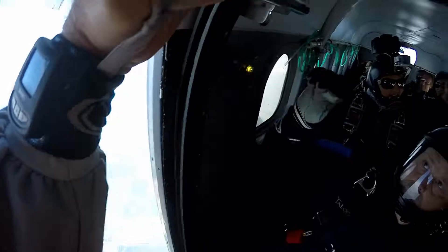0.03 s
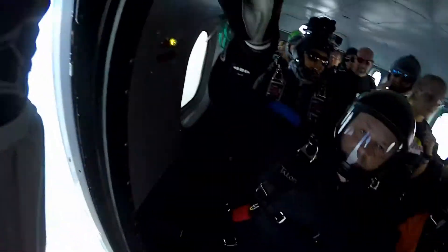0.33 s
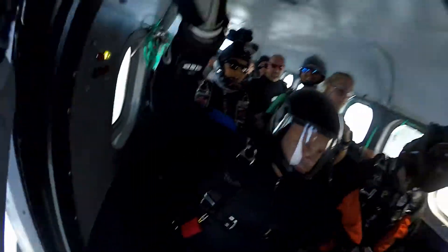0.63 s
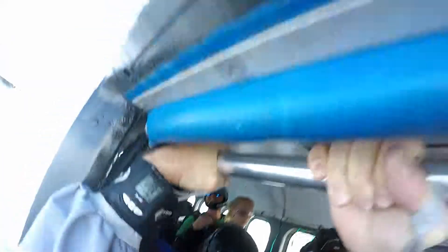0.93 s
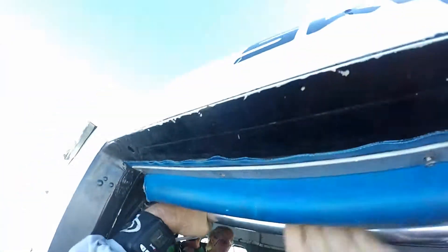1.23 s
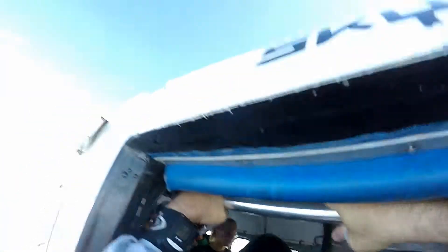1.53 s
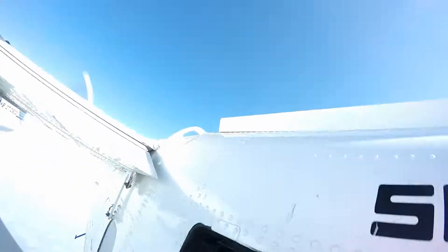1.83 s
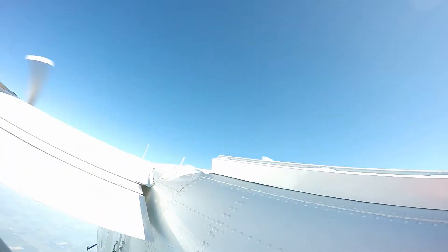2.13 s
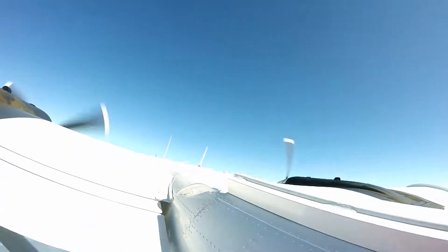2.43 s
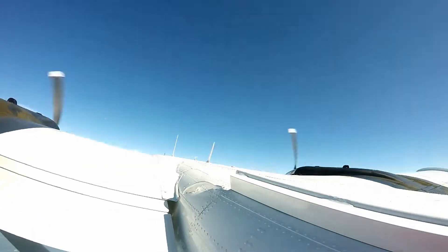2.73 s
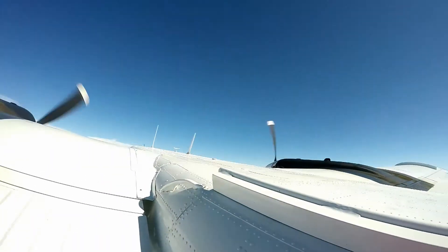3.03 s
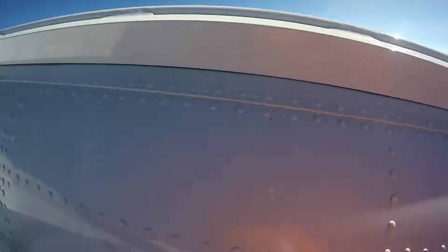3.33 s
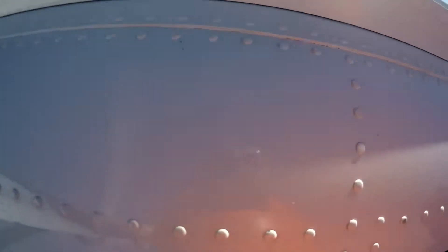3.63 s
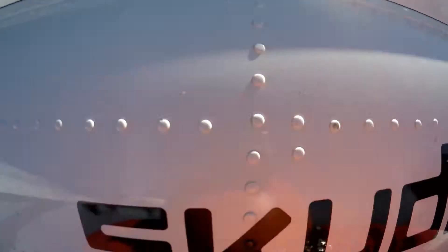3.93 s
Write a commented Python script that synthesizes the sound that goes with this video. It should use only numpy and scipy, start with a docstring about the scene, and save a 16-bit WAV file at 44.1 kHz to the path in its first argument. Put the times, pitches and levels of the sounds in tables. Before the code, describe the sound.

Loud wind rushes over a camera case outside a flying propeller plane. In the first 0.4 seconds a sleeve scrapes the case, with two hard knocks among lighter snags. A quiet moment follows: muffled engines, a faint draught and a thin turbine whine. At about 1 second the engines swell and the slipstream hits, with deep rumble, rapid buffeting and harsh hiss continuing until the end at 4 seconds.

```python
"""At the door of a propeller aircraft in flight, a small camera in a plastic housing is carried outside.
A sleeve rubs over the housing and it takes two hard knocks among lighter snags. The cabin is briefly
quiet: muffled engines, a draught, a thin turbine whine. From one second on the slipstream hits: large
eddies rumble, small ones buffet the case in bursts, and a harsh rush rings in the housing."""
import sys
import numpy as np
from scipy import signal
from scipy.fft import rfft, irfft
from scipy.io import wavfile
from scipy.ndimage import uniform_filter1d

SR = 44100
rng = np.random.default_rng(int(sys.argv[2]) if len(sys.argv) > 2 else 0)


def wrap_up_sound(samples):
    """Save the sound to the file named by the first command line argument, as 16-bit audio."""
    columns = np.atleast_2d(samples).T
    # keep every value between -1 and 1, then stretch to whole-number steps
    tamed = np.clip(columns, -1, 1)
    steps = np.round(tamed * 32767).astype(np.int16)
    wavfile.write(sys.argv[1], SR, steps)


N = 176400
T = np.arange(N) / SR


def from_db(db):
    """Decibels to gain."""
    return 10 ** (np.asarray(db) / 20)


def unit_rms(x):
    """Scale to rms 1."""
    return x / np.sqrt(np.mean(x ** 2) + 1e-20)


def level_curves(rows):
    """One dB curve per level column, rising 20 dB per 75 ms up to the first row."""
    times_s, *columns = np.transpose(rows)
    fade_db = 20 * np.minimum(T - times_s[0], 0) / 0.075
    return [np.interp(T, times_s, column) + fade_db for column in columns]


def coloured(x, spectrum):
    """Shape x by a spectrum drawn over log frequency, with steep skirts; rms 1."""
    hz, db = np.transpose(spectrum)
    log_f = np.log(np.maximum(np.fft.rfftfreq(N, 1 / SR), 1))
    outside = np.maximum(np.log(hz[0]) - log_f, 0) + np.maximum(log_f - np.log(hz[-1]), 0)
    gain = from_db(np.interp(log_f, np.log(hz), db) - 20 * outside)
    return unit_rms(irfft(rfft(x) * gain, N))


def band_noise(low_hz, high_hz):
    """Random swings between two rates; rms 1."""
    band = signal.butter(2, [low_hz, high_hz], "band", fs=SR, output="sos")
    return unit_rms(signal.sosfilt(band, rng.standard_normal(N)))


def turbulence(spectrum, flutter_db, steady_s, side_db):
    """Nearly mono fluttering noise, its power evened out over steady_s."""
    mid, side = [coloured(rng.standard_normal(N) * from_db(flutter_db), spectrum) for _ in range(2)]
    power = uniform_filter1d(mid ** 2, int(steady_s * SR))
    return unit_rms(mid / np.sqrt(power + 1e-9)) + from_db(side_db) * side * [[1], [-1]]


# Sleeve on the case. Each row: time in seconds, scrape, sizzle and handling levels in dB.
SLEEVE_LEVELS = [(0, -95, -95, -87), (.076, -85, -84, -72), (.081, -43, -62, -29), (.105, -42, -47, -19.5),
                 (.118, -28.5, -43, -24), (.135, -24.5, -44, -32), (.152, -26.5, -45, -23),
                 (.163, -46, -54, -27), (.208, -42, -51, -26), (.227, -26.5, -40, -25),
                 (.241, -18, -26, -21), (.249, -17, -17.5, -15), (.27, -21.5, -19, -18),
                 (.3, -19, -19, -15), (.322, -25.5, -36, -15), (.356, -19, -27.5, -29),
                 (.372, -43, -44, -23), (.405, -57, -80, -38), (.45, -85, -95, -57)]
# Rubbing spectra. Each row: frequency in Hz, relative density in dB.
SCRAPE_SPECTRUM = [(200, -12), (350, -13), (700, -11), (1100, -6), (1750, 3), (2500, -6), (3300, -2.5),
                   (4200, -15), (5200, -10), (7000, -20), (9500, -29), (15000, -28)]
SIZZLE_SPECTRUM = [(1500, -28), (3400, 2), (5500, 0), (7500, -3.5), (9500, -12), (11500, -4.5),
                   (15000, -18)]
HANDLING_SPECTRUM = [(12, 2), (28, 8.5), (60, 5.5), (110, -13), (170, -21), (260, -31), (500, -39)]


def sleeve():
    """Cloth catches and slips on the case and jostles it; firm rubbing sizzles."""
    scrape_db, sizzle_db, handling_db = level_curves(SLEEVE_LEVELS)
    catch_db = 1.2 * band_noise(60, 900)
    scrape = from_db(scrape_db) * turbulence(SCRAPE_SPECTRUM, catch_db, steady_s=0.03, side_db=-22)
    sizzle = from_db(sizzle_db) * turbulence(SIZZLE_SPECTRUM, catch_db, steady_s=0.01, side_db=-30)
    handling = from_db(handling_db) * turbulence(HANDLING_SPECTRUM, 0, steady_s=0.046, side_db=-52)
    return scrape + sizzle + handling


# Peaks and nulls of the case. Each row: centre in Hz, width in Hz, gain in dB.
HOUSING_BANDS = [(1960, 87, 5.5), (3075, 260, 6.5), (3375, 210, -16.5), (3690, 220, 5.5),
                 (4110, 160, -14.5), (4940, 200, 8.5), (5090, 150, -8), (5850, 250, -4.5), (6445, 300, 8),
                 (6980, 280, -4.5), (10640, 440, 5), (10840, 490, -9), (12700, 400, 1), (12900, 700, 1),
                 (14000, 500, -3)]


def housing(x):
    """The case colours sound with its resonances and nulls; rms 1."""
    for hz, width_hz, db in HOUSING_BANDS:
        w, g = 2 * np.pi * hz / SR, from_db(db / 2)
        k = np.sin(w) * width_hz / (2 * hz)
        x = signal.lfilter([1 + k * g, -2 * np.cos(w), 1 - k * g],
                           [1 + k / g, -2 * np.cos(w), 1 - k / g], x)
    return unit_rms(x)


# Engines in the cabin. Each row: time in seconds, level in dB.
ENGINE_LEVELS = [(0, -101), (.07, -72), (.1, -39), (.36, -49), (.42, -54.5), (.55, -54), (.7, -49),
                 (.8, -46.5), (.95, -44.5), (1.1, -15), (4, -65)]
# Engine roar. Each row: frequency in Hz, relative density in dB.
ENGINE_SPECTRUM = [(150, 10), (310, -3), (420, 2.5), (620, 0), (850, -1), (1200, -3), (1550, 2), (2100, -6),
                   (3000, -3.5), (4200, -8.5), (6500, -17), (9000, -23), (15000, -27)]


def engines():
    """Muffled engine roar, heard through the housing."""
    level_db, = level_curves(ENGINE_LEVELS)
    return from_db(level_db) * housing(coloured(rng.standard_normal(N), ENGINE_SPECTRUM))


def ring(x, hz, t60_s):
    """One damped mode: a unit click starts a sine of height 1."""
    r, w = from_db(-60 / (t60_s * SR)), 2 * np.pi * hz / SR
    return signal.lfilter([0, np.sin(w)], [1, -2 * r * np.cos(w), r * r], x + 1e-18)


# Knocks and snags. Each row: start in seconds, hit gain in dB, contact cutoff in Hz,
# thump gain in dB, ping gain in dB.
KNOCK_HITS = [(0.2432, -0.5, 5000, -9.5, -33), (0.269, -15, 600, -10.5, -50), (0.2844, -8, 600, -10.5, -50),
              (0.3019, -8.5, 650, -13, -52), (0.3587, 6.5, 1740, 3, -30), (.771, -45, 9030, -56, -65)]
# Modes of the case and its mount. Each row: frequency in Hz, gain in dB, T60 in seconds.
CASE_MODES = [(740, -4.5, 0.0071), (1097, -0.5, 0.015), (1645, -2, 0.012), (2960, 2.5, .012),
              (3530, 1, 0.015), (5000, 0, 0.0084), (6530, -4, 0.016)]
MOUNT_MODES = [(45, -15.5, 0.13), (97, 2, 0.033), (135, -2.5, 0.0485)]


def knocks(length_s=0.5, thump_lag_s=0.00178, crack_db=-3.5, crack_t60_s=0.01):
    """Each knock cracks, rings the case and sways the mount; a soft contact loses its treble."""
    out, t = np.zeros(N), T[:int(length_s * SR)]
    click = signal.unit_impulse(len(t))
    push = signal.unit_impulse(len(t), int(thump_lag_s * SR))
    body = sum((-1) ** k * from_db(db) * ring(click, hz, t60_s)
               for k, (hz, db, t60_s) in enumerate(CASE_MODES))
    thump = sum(from_db(db) * ring(push, hz, t60_s) for hz, db, t60_s in MOUNT_MODES)
    ping = ring(click, hz=1832, t60_s=0.22)
    crack_envelope = from_db(crack_db - 60 * t / crack_t60_s)
    for start_s, hit_db, cutoff_hz, thump_db, ping_db in KNOCK_HITS:
        contact = signal.butter(2, cutoff_hz, fs=SR)
        hit = signal.lfilter(*contact, body + crack_envelope * rng.standard_normal(len(t)))
        knock = from_db(hit_db) * hit + from_db(thump_db) * thump + from_db(ping_db) * ping
        start = int(start_s * SR)
        out[start:start + len(t)] += knock
    return out


# Draught at the door. Each row: time in seconds, level in dB.
DRAUGHT_LEVELS = [(.4, -77), (.6, -82), (.8, -61), (.97, -54), (1.1, -54)]
# Draught hiss. Each row: frequency in Hz, relative density in dB.
DRAUGHT_SPECTRUM = [(3000, -8), (4800, -6), (6500, -4), (9000, -2), (15000, -10)]


def draught():
    """Air hisses thinly at the door, heard through the housing."""
    level_db, = level_curves(DRAUGHT_LEVELS)
    return from_db(level_db) * housing(coloured(rng.standard_normal(N), DRAUGHT_SPECTRUM))


# Turbine whine. Each row: time in seconds, level in dB.
TURBINE_LEVELS = [(.4, -72), (.65, -71), (.8, -64), (.95, -56), (1.1, -57)]


def turbine(centre_hz=7960, width_hz=120):
    """The turbine whines in one narrow band of noise."""
    level_db, = level_curves(TURBINE_LEVELS)
    return from_db(level_db) * band_noise(centre_hz - width_hz / 2, centre_hz + width_hz / 2)


# Wind rumble. Each row: time in seconds, deep and upper relative levels in dB.
RUMBLE_LEVELS = [(0.5, -56, -68), (0.66, -53.5, -60), (0.76, -46, -57), (0.86, -38, -49.2),
                 (0.91, -34.5, -33.5), (0.98, -30, -29), (1.03, -17, -26.5), (1.15, -25, -20.5),
                 (1.5, -19, -17), (1.8, -22.5, -19.5), (2.05, -23, -22), (2.3, -23.5, -16),
                 (2.55, -26, -15.5), (2.8, -20.5, -15), (3.1, -20.5, -18.5), (3.35, -27, -12.5),
                 (3.6, -18.5, -17), (3.92, -23.5, -14.5)]
# Rumble spectra. Each row: frequency in Hz, relative density in dB.
DEEP_SPECTRUM = [(10, -51), (24, -2), (45, -1), (85, -3.5), (110, -2), (140, -31), (250, -49)]
UPPER_SPECTRUM = [(85, 0), (112, -9), (135, 3), (170, -1.5), (205, -10), (250, -37.5), (400, -38)]
# Upper rumble as the case turns. Each row: time in seconds, centre in Hz.
SHEDDING_RATES = [(1.0, 134.4), (1.4, 137.6), (2.3, 136.8), (2.75, 145.7), (3.1, 136.3), (3.38, 119),
                  (3.9, 128.4)]


def rumble(upper_centre_hz=136.35):
    """Large eddies push on the case; their shedding rate drifts with its angle to the flow."""
    deep_db, upper_db = level_curves(RUMBLE_LEVELS)
    deep = turbulence(DEEP_SPECTRUM, 0, steady_s=0.094, side_db=-34)
    upper = turbulence(UPPER_SPECTRUM, 0, steady_s=0.2, side_db=-52.5)
    pitch_ratio = np.interp(T, *np.transpose(SHEDDING_RATES)) / upper_centre_hz
    warped_s = (np.cumsum(pitch_ratio) / SR) % T[-1]
    drifting = np.array([np.interp(warped_s, T, channel) for channel in upper])
    return from_db(deep_db + 0.5) * deep + from_db(upper_db - 0.66) * drifting


# Buffeting. Each row: time in seconds, low and high relative levels in dB.
BUFFET_LEVELS = [(0.97, -44.5, -52), (1.03, -29, -28.5), (1.12, -31, -42), (1.4, -24, -26.5),
                 (1.65, -24.5, -21), (1.82, -30, -29.5), (2.06, -32, -29), (2.24, -23, -24),
                 (2.5, -23.5, -23.5), (2.8, -24.5, -23.5), (3.1, -25, -23.5), (3.38, -21.0, -24.5),
                 (3.58, -19.1, -23), (3.75, -19.1, -21.5), (3.92, -19.5, -25)]
# Buffeting spectra. Each row: frequency in Hz, relative density in dB.
LOW_SPECTRUM = [(130, -44), (230, 2.5), (330, -0.5), (480, 1.5), (750, -3.5), (1000, -5), (1300, -19.5),
                (2200, -51)]
HIGH_SPECTRUM = [(700, 1), (1150, -3), (1600, 1), (2000, -2), (2350, -24), (3200, -5)]


def buffeting(beat_db, bursts_db):
    """Small eddies break on the case in two mid-range bands."""
    low_db, high_db = level_curves(BUFFET_LEVELS)
    low_flutter_db = 0.5 * beat_db + bursts_db + 2.6 * band_noise(9.4, 324)
    low = turbulence(LOW_SPECTRUM, low_flutter_db, steady_s=0.27, side_db=-61)
    high = turbulence(HIGH_SPECTRUM, 0.5 * beat_db + 0.45 * bursts_db, steady_s=0.27, side_db=-29)
    return from_db(low_db) * low + from_db(high_db - 1.04) * high


# Rush of air. Each row: time in seconds, howl and hiss relative levels in dB.
RUSH_LEVELS = [(0.98, -55, -58), (1.03, -26.5, -36), (1.11, -21, -24), (1.35, -21, -23.5),
               (1.63, -21, -23.5), (1.8, -16.5, -24.5), (1.97, -17.5, -24.5), (2.2, -18, -25),
               (2.45, -19, -25), (2.8, -20, -24.5), (3.15, -19.5, -24.5), (3.45, -20.5, -27),
               (3.7, -21, -26), (3.92, -19, -27)]
# Rush spectra. Each row: frequency in Hz, relative density in dB.
HOWL_SPECTRUM = [(1200, -29.5), (2000, -10.5), (2250, -7.5), (2600, 1), (3050, -1), (3400, -9), (3700, -8),
                 (4500, -40)]
HISS_SPECTRUM = [(2900, -9), (3450, 5.5), (3700, 6), (4200, 5.5), (4800, 1), (5700, -4.5), (7200, -7),
                 (8600, -8.5), (9600, -14), (13000, -13), (15200, -20)]


def rush(beat_db, bursts_db):
    """Fast air howls and hisses in the housing, slightly louder on the right."""
    howl_db, hiss_db = level_curves(RUSH_LEVELS)
    howl_flutter_db = beat_db + 1.14 * bursts_db + 1.23 * band_noise(30.5, 200)
    howl = turbulence(HOWL_SPECTRUM, howl_flutter_db, steady_s=0.177, side_db=-25)
    hiss = turbulence(HISS_SPECTRUM, 0.75 * beat_db + 1.2 * bursts_db, steady_s=0.144, side_db=-29.5)
    return (from_db(howl_db + 0.16) * housing(howl) * from_db([[-0.45], [0.45]])
            + from_db(hiss_db - 0.53) * housing(hiss) * from_db([[-0.15], [0.15]]))


# Wake beating, deeper as the case nears the fuselage. Each row: time in seconds, rms depth in dB.
WAKE_DEPTHS = [(1, 1.0), (2.9, 1), (3.4, 1.5), (4, 3)]


def slipstream():
    """Rapid eddy bursts and the slower beating of the wake shake buffeting and rush together."""
    bursts_db = band_noise(30.4, 242)
    beat_db = np.interp(T, *np.transpose(WAKE_DEPTHS)) * band_noise(9.4, 64.6)
    return buffeting(beat_db, bursts_db) + rush(beat_db, bursts_db)


def scene():
    """Handling, cabin, then the open air; stereo."""
    return sleeve() + knocks() + engines() + draught() + turbine() + rumble() + slipstream()


def record(dry, ceiling=0.86, cutoff_hz=15300):
    """The highest peaks overload softly; a steep low-pass cuts the top."""
    clipped = dry / (1 + (dry / ceiling) ** 8) ** (1 / 8)
    return signal.sosfilt(signal.ellip(12, 0.1, 80, cutoff_hz, fs=SR, output="sos"), clipped)


dry = scene()
out = record(dry)
wrap_up_sound(out)
```